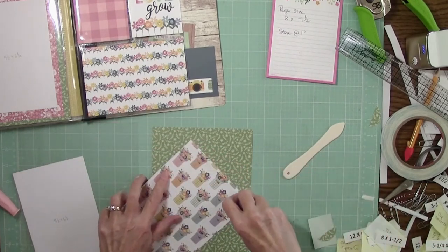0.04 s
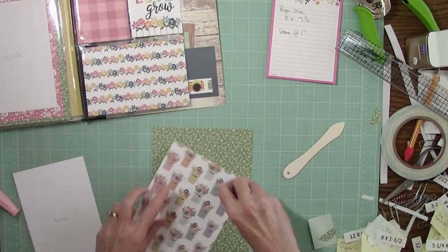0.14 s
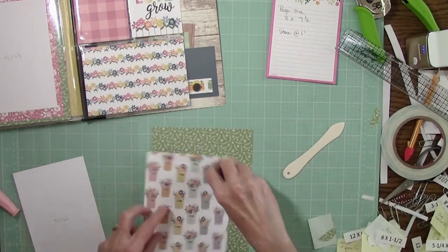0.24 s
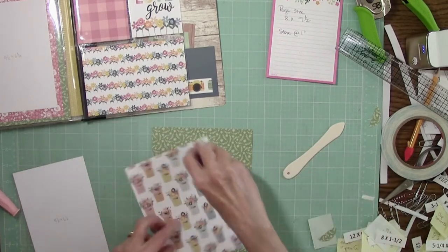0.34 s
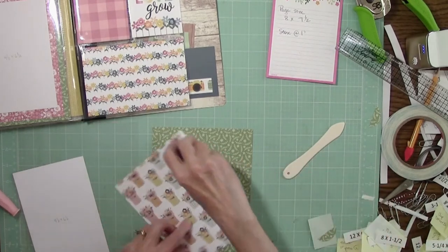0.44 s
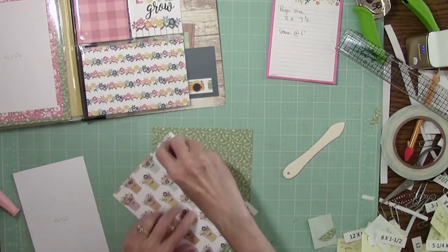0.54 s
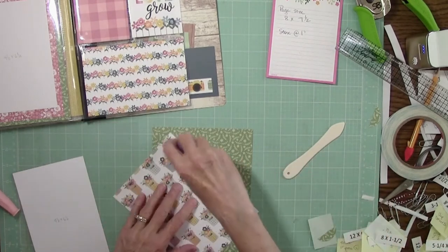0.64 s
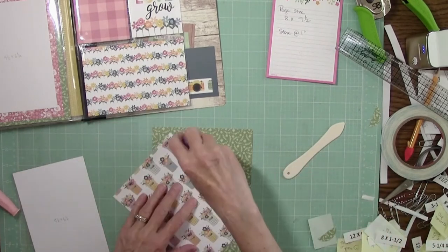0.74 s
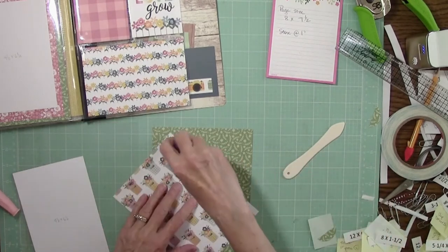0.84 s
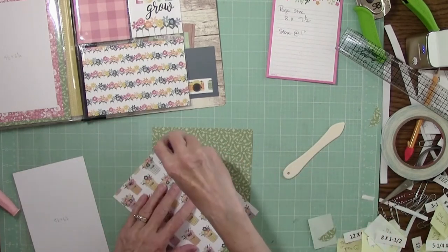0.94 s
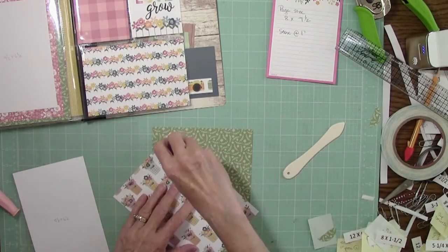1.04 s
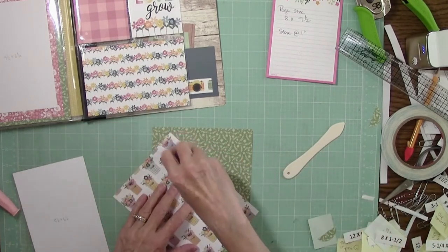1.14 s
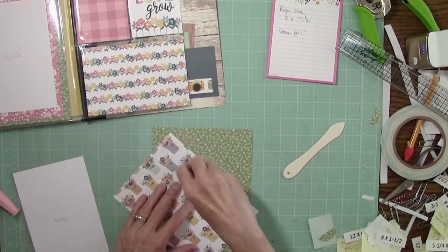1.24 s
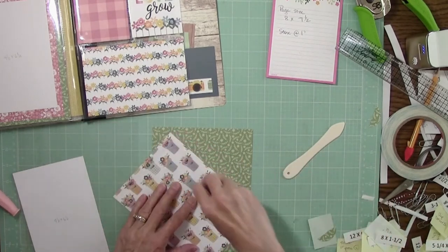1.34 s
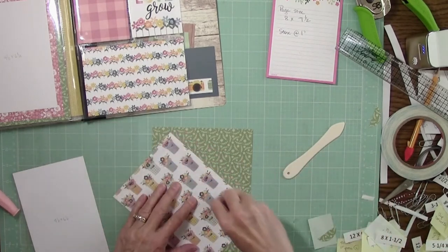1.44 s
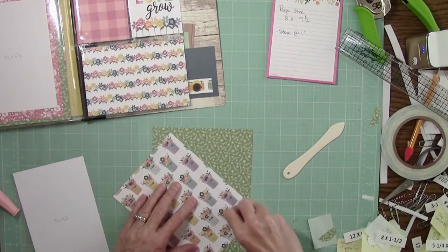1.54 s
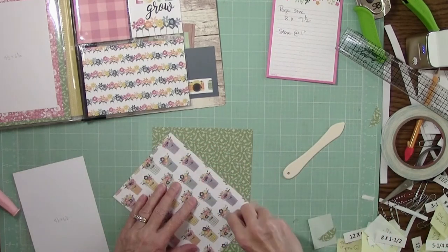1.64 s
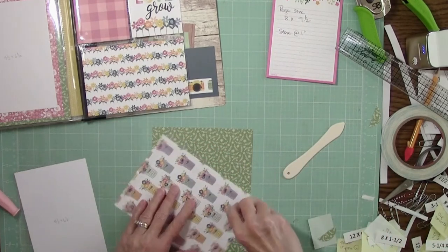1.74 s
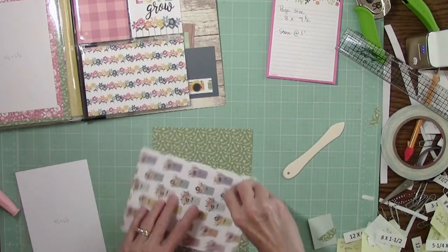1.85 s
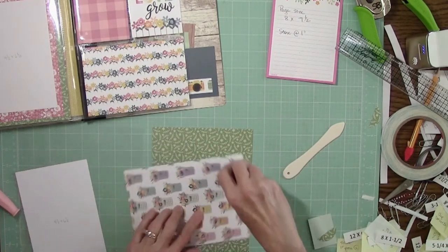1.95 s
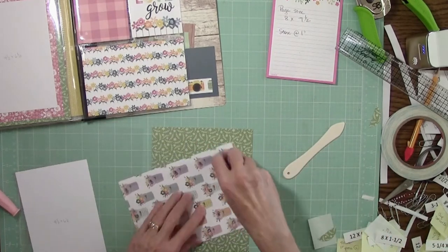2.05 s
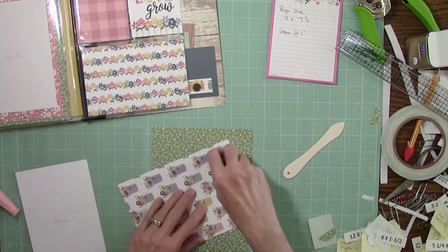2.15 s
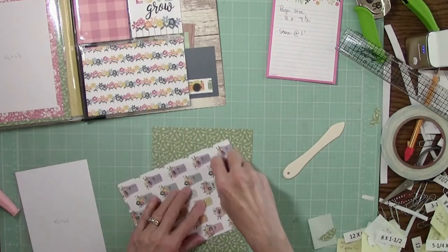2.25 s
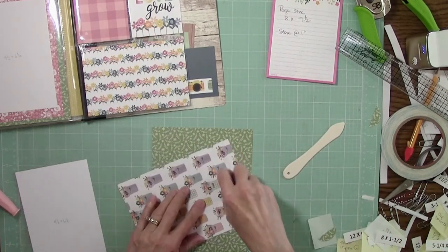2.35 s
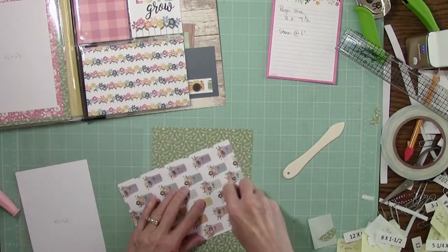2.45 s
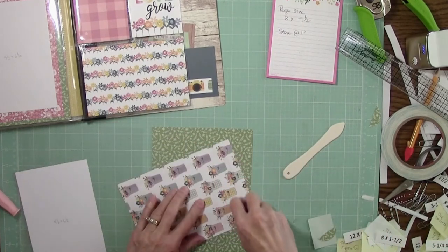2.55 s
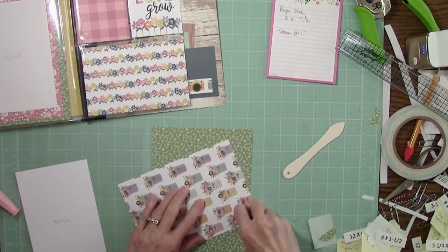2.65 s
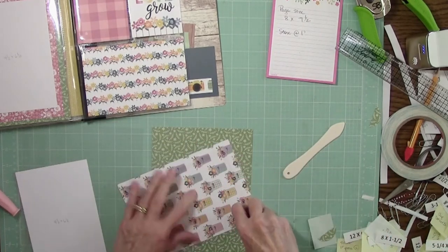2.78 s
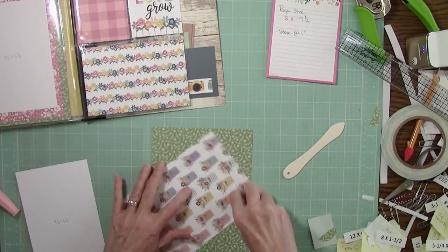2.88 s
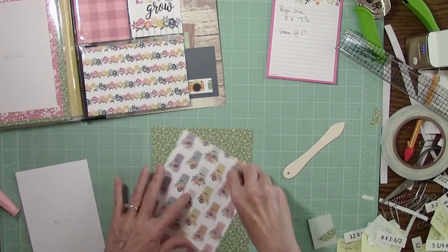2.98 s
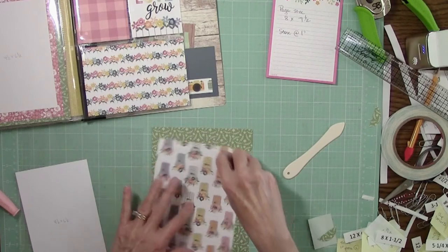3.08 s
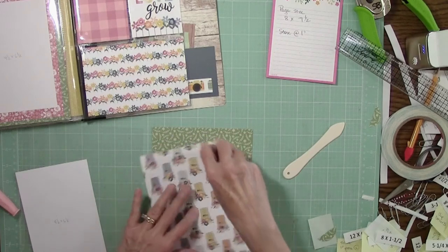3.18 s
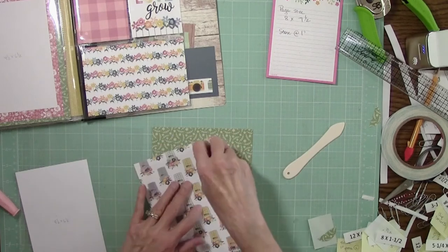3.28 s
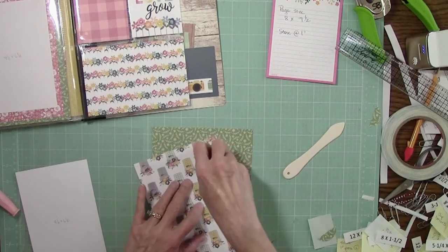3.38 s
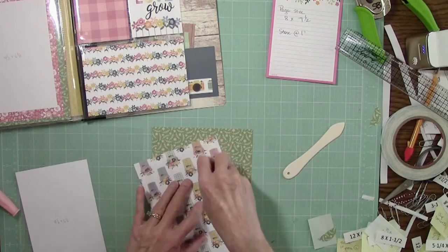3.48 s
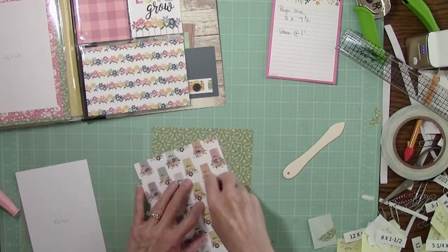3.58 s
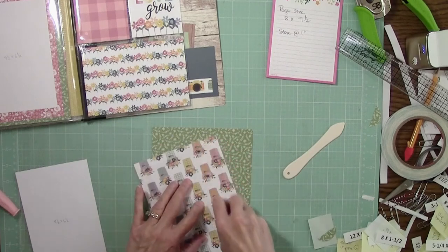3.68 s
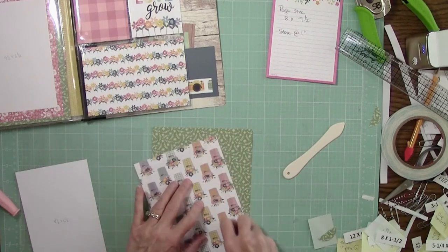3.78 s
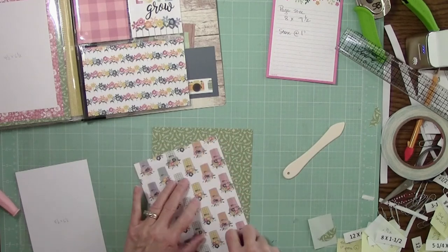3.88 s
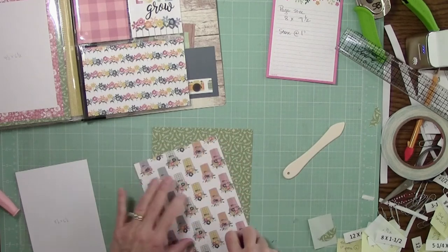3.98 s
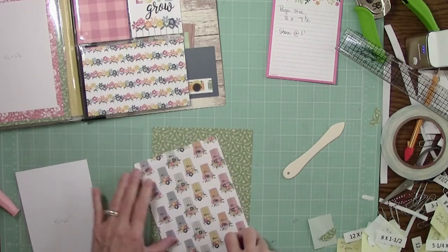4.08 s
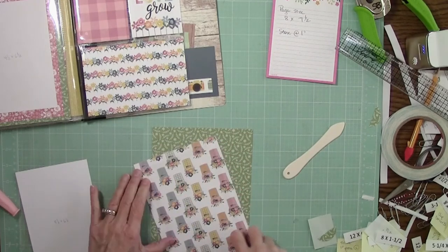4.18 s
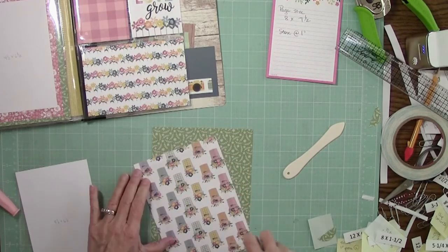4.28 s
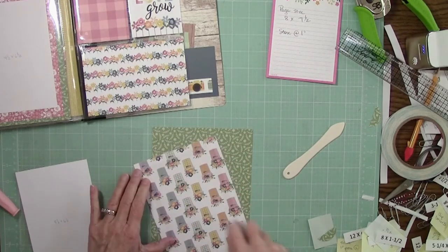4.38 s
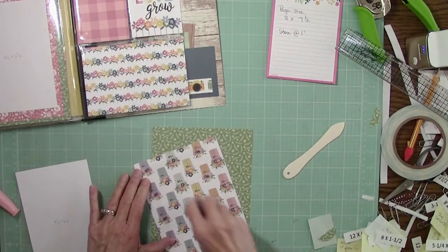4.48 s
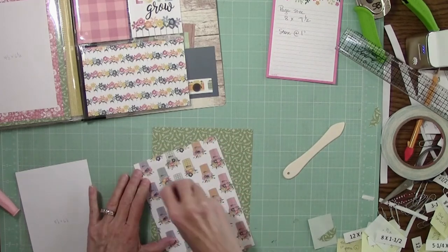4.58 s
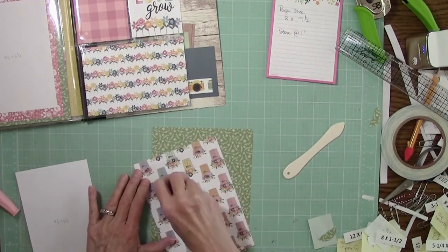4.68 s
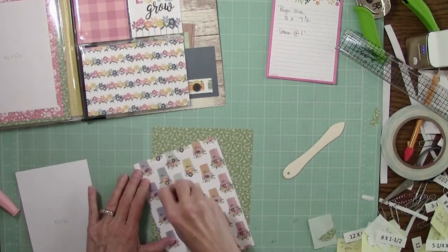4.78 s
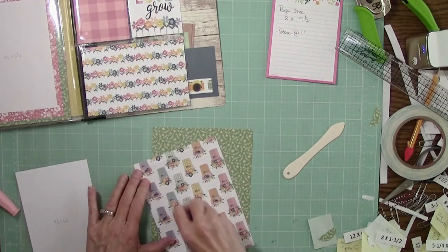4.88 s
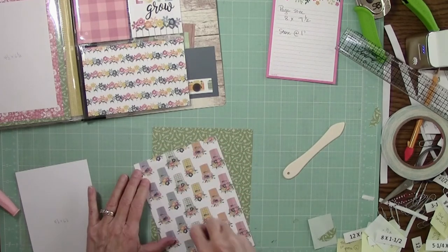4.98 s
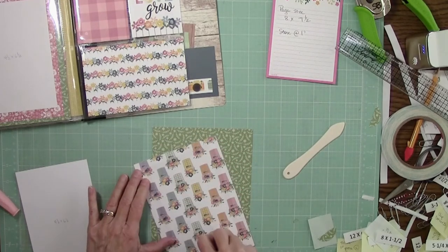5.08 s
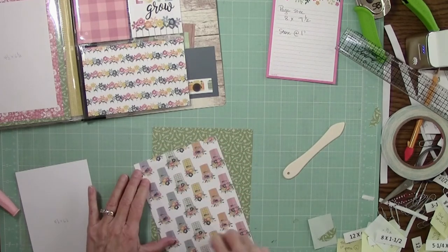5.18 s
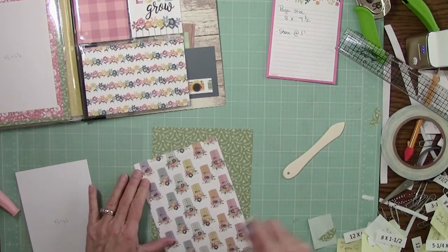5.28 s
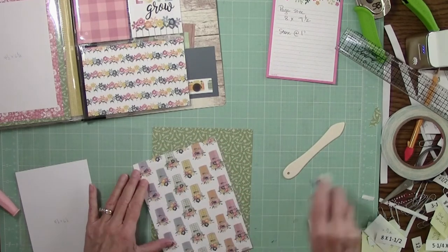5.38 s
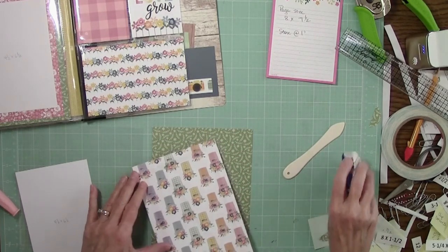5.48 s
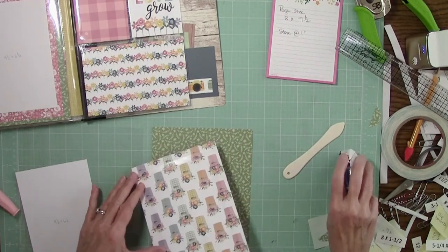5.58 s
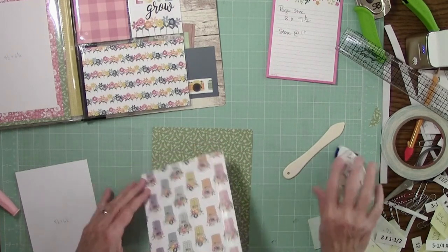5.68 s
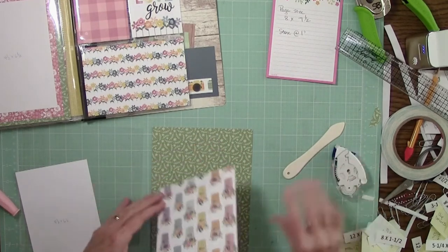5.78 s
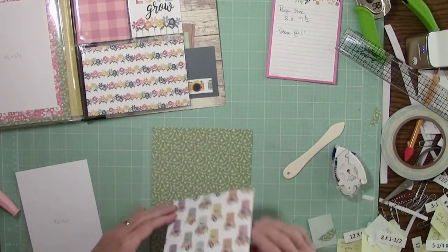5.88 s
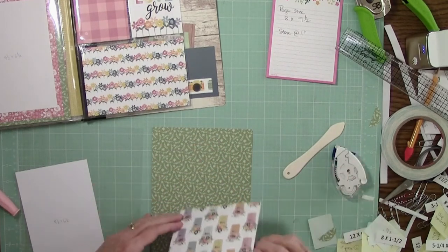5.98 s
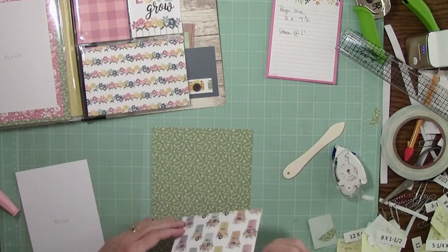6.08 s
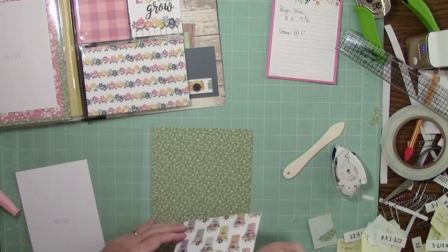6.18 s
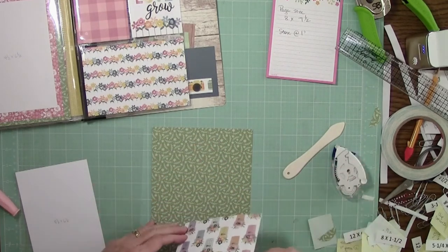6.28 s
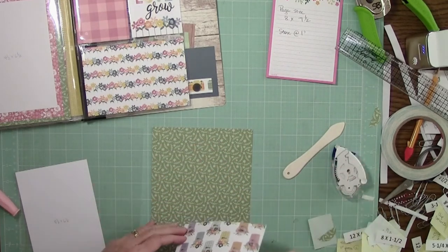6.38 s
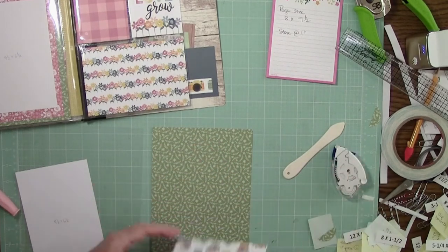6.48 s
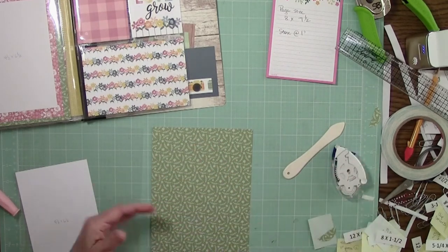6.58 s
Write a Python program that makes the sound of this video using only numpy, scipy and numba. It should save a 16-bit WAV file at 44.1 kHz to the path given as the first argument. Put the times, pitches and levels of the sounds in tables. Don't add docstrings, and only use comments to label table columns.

```python
import sys
import numpy as np
from scipy import signal
from scipy.fft import rfft, irfft, next_fast_len
from scipy.io import wavfile
from scipy.ndimage import uniform_filter1d
from numba import njit

SR = 44100
rng = np.random.default_rng(int(sys.argv[2]) if len(sys.argv) > 2 else 0)


def magnitude_from_level(level_db):
    exponent = np.asarray(level_db, float) / 20
    return 10 ** exponent


def unload_wav(signal):
    wavfile.write(
        sys.argv[1],
        SR,
        np.round(np.clip(np.atleast_2d(signal).T, -1, 1) * 32767).astype(np.int16),
    )


N = 292427
TIME_S = np.arange(N) / SR

# (time [s], drag level [dB])
STROKES = [
    [(1.19, -31), (1.202, -30.5), (1.222, -34), (1.26, -26.5), (1.604, -27), (1.692, -36), (1.77, -56)],
    [(2.28, -39), (2.34, -29.5), (2.406, -33), (2.496, -27), (2.53, -29), (2.656, -26.5), (2.77, -49)],
    [(3.5, -32.5), (3.508, -29), (3.576, -25.5), (3.708, -26.5), (3.846, -22.5), (3.852, -25.5),
     (3.96, -30.5), (4.08, -53)],
    [(4.83, -44), (4.88, -25.5), (4.964, -22.5), (5.036, -26), (5.066, -23), (5.146, -28.5), (5.24, -49)],
]
# (time [s], peak [dB])
FIRST_TEETH = [(1.152, -18.5), (1.165, -14), (1.176, -17), (1.183, -18), (1.19, -20), (1.2, -28),
               (2.277, -26), (2.293, -28), (2.303, -21), (2.315, -17.5), (3.429, -23), (3.455, -18.5),
               (3.478, -18), (3.492, -19), (3.502, -24.5), (3.509, -32)]
# (time [s], length [s], boost [dB], cavity frequency [Hz])
BOOMS = [(1.19, .03, 5, 1330), (1.235, 0.027, 1, 1280), (1.31, 0.092, 2.5, 1450), (1.49, .04, 2, 1366),
         (1.585, 0.052, 7, 1550), (2.345, 0.11, 7.5, 1360), (2.455, 0.064, 3, 1370), (2.65, 0.083, 2, 1417),
         (3.6, 0.035, 0, 1510), (3.735, 0.038, 4, 1460), (3.89, 0.055, 4, 1430), (3.96, 0.028, 4.5, 1550),
         (4.06, 0.04, 0, 1570), (4.95, 0.051, 6, 1443), (5.14, 0.048, 3, 1355)]
# (frequency [Hz], width [Hz], level [dB])
SHELL_MODES = [(2510, 1060, -9), (2724, 293, 0), (2995, 320, -3), (3328, 383, 0), (3734, 600, -5),
               (4260, 254, -3.5), (4750, 1640, -14)]
# (frequency [Hz], width [Hz], level [dB])
PEEL_MODES = [(5650, 890, -1.5), (7450, 1160, 4.5), (9480, 1670, 3.5), (13000, 2300, -2)]
# (frequency [Hz], width [Hz], level [dB])
CRACK_MODES = [(5150, 970, -2.5), (7260, 3400, 1.5), (9640, 2400, 2.5), (12640, 3600, -4.5)]
# (time [s], peak [dB], voice [0 cavity, 1 shell, 2 crack])
TICKS = [(0.012, -26, 0.79), (0.054, -26, 1.6), (0.342, -27, 1.5), (0.453, -31, 1.7), (0.627, -31, 0.39),
         (0.712, -30.5, 1.8), (0.809, -40, 0.54), (0.88, -41.5, 0.1), (1.013, -26.5, 0.47),
         (1.086, -34, .3), (1.118, -37, 1.1), (1.144, -30, 0.88), (2.045, -18.5, 1.84),
         (2.248, -21.5, 1.05), (2.256, -24, 1.4), (2.866, -38, .1), (4.097, -37, 1.2), (4.206, -32, 1.8),
         (4.295, -32, 1.8), (4.735, -29, 0.1), (4.837, -34, .1), (5.251, -29.5, 2.1), (5.26, -28.5, 0.088),
         (5.381, -26.5, 0.43), (5.446, -38, .3), (6.164, -38.5, 0.34), (6.235, -45, 0.44),
         (6.342, -45, 0.25)]
# (time [s], peak [dB])
SNAPS = [
    (0.303, -15),
    (0.722, -29),
    (1.842, -16),
    (2.95, -17),
    (3.841, -18),
    (4.164, -34),
    (4.268, -28),
    (4.272, -25),
    (4.279, -26),
    (4.284, -23),
]
# (level [dB]) in cavity, shell, crack
SNAP_MIX_DB = [-20, -20.5, 0.]
# (level [dB]) in cavity, shell, peel
TOOTH_MIX_DB = [-14.5, -10.5, -10.5]
# (time [s], rub level [dB])
TURNS = [
    [(.108, -57), (.162, -38), (.2, -40.5), (.3, -37.5), (.412, -34), (.452, -34.5), (.488, -39),
     (.55, -37.5), (.705, -55.5)],
    [(1.772, -60), (1.806, -36.5), (1.84, -35.5), (1.9, -35.5), (1.984, -35.5), (2.02, -38), (2.06, -41),
     (2.188, -44.5), (2.22, -60)],
    [(2.79, -57), (2.862, -51), (2.942, -41.5), (2.98, -38), (3.134, -40.5), (3.2, -41), (3.302, -39.5),
     (3.36, -49.5), (3.408, -55)],
]
# (peak time [s], length [s], hiss [dB], sheet body [dB])
BRUSHES = [(0.0, 0.064, -41.5, -31), (0.066, 0.063, -62, -44), (2.233, 0.033, -54, -40.5),
           (4.155, .03, -57, -51), (4.211, 0.025, -44.5, -40), (4.244, 0.021, -50, -48),
           (4.282, 0.044, -39, -40), (5.255, 0.042, -49, -45), (5.318, 0.03, -51, -60),
           (5.385, 0.078, -52, -49), (5.48, 0.11, -54.5, -53)]
# (start [s], end [s], start [Hz], end [Hz], width [Hz], level [dB])
SQUEAKS = [
    (0.16, 0.277, 2930, 2760, 45, -40.5),
    (0.32, 0.49, 7700, 7500, 400, -32.5),
    (0.333, .4, 3170, 3370, 100, -45),
    (0.417, 0.475, 2600, 2480, 200, -45),
    (2.85, 2.91, 1560, 1480, 220, -49),
    (2.93, 2.998, 1480, 1400, 220, -47),
    (4.13, 4.17, 1500, 1480, 200, -51),
]
# (frequency [Hz], density [dB/Hz])
SLIDE_HISS = [(2350, -74), (4000, -13.5), (7150, 3), (10300, -1), (15300, -11.5), (16200, -27),
              (16500, -43)]
# (frequency [Hz], density [dB/Hz])
SLIDE_BODY = [(530, -28), (900, -13), (960, -8), (1310, -3.5), (3230, -1.5), (3780, -3), (5000, -10),
              (6500, -17.5), (11000, -120)]
# (time [s], peak [dB], voice [0 low, 1 mid, 2 bright])
SCUFFS = [
    (0.713, -26, 1.95),
    (3.417, -25, 1),
    (4.272, -34, 1.4),
    (4.735, -29, 0.7),
    (6.163, -36, 0.59),
    (6.539, -18.5, 0.8),
]
# (time [s], peak [dB])
FLAPS = [
    (6.168, -42),
    (6.183, -42),
    (6.455, -37.5),
    (6.543, -39),
    (6.56, -33),
    (6.574, -33),
    (6.598, -40),
]
# (time [s], peak [dB])
LANDING = [
    (5.6195, 0.5),
]
# (level [dB]) in table, low, mid, crack
LANDING_MIX_DB = [-22.5, -15, -10, -6.5]
# (time [s], peak [dB], voice [0 table, 1 low, 2 mid, 3 crack])
KNOCKS = [
    (5.764, -22.5, 1.7),
    (5.778, -19, 0.93),
    (5.786, 2.5, 2.28),
]
# (level [dB]) in table, low, mid, crack
KNOCK_MIX_DB = [-5, -0.3, -7.5, 0.3]
# (time [s], peak [dB], voice [0 table, 1 low, 2 mid, 3 crack])
EDGE_TAPS = [
    (6.433, -43, .9),
    (6.453, -14, 1.5),
    (6.4565, -16, 1.33),
    (6.5529, -15.5, 2.64),
    (6.5565, -12.5, 1.58),
]
# (level [dB]) in table, low, mid, crack
EDGE_MIX_DB = [-5, -0.1, -6, -2]
# (frequency [Hz], width [Hz], level [dB])
KNOCK_MODES = [
    [(266, 72, -3), (582, 235, 4.5)],
    [(768, 440, 1.5), (1280, 870, 2), (1980, 950, 2.5), (2600, 800, -1)],
    [(3470, 560, 7.5), (4510, 550, 6.5)],
    [(6720, 2600, 4), (7700, 2720, 4.5), (10680, 3400, -7.5)],
]
# (time [s], peak [dB])
THUMPS = [
    (1.011, -28),
    (1.359, -39),
    (3.719, -36.5),
    (4.959, -35.5),
    (5.629, -30),
    (5.66, -32),
    (5.79, -34.5),
    (6.179, -57),
    (6.574, -39.5),
]
# (frequency [Hz], T60 [s])
ROOM_T60 = [(300, 0.49), (1500, 0.49), (4000, 0.42), (9000, 0.11), (15000, 0.36)]
# (frequency [Hz], density [dB/Hz])
AIR = [(18, -16), (25, -3), (50, 3.5), (100, 2), (200, 0.5), (310, 0), (500, -3.5), (1000, -8.5),
       (2000, -9), (4000, -15.5), (8000, -19.5), (13000, -25.5), (16500, -32)]
# (frequency [Hz], side minus mid [dB])
AIR_SIDE = [(25, -10), (60, -9), (125, -1), (300, 1.5), (700, 1), (1300, -1), (2400, -11.5), (8000, -6.5),
            (16000, -5)]
# (frequency [Hz], level [dB])
HUM = [(120, -59), (241, -59)]

FULL_DRAG_DB, TEETH_HZ, TEETH_SPAN_DB, SLOWEST_SHARE = -26, 484.2, 12, 0.25
CAVITY_WIDTH_HZ, BOOM_WIDTH_HZ = 270, 133
CAVITY_DB, RASP_DB, SEAM_DB, GRIP_DB = -6, -14, -6, 2.5
PEEL_DB, PEEL_DB_PER_DRAG_DB = -4, 0.21
SHEET_DB, SHEET_DB_PER_RUB_DB, FIRM_RUB_DB = -43, 0.79, -36
BRUSH_RISE_SHARE, BRUSH_FALL_DB = 0.27, 15.5
OPEN_DB, DUCK_S, DUCK_DB, RECOVER_DB_PER_S = 1.24, 5.593, -10, 2.5
AIR_DB, AIR_SWELL_DB = -45.5, 0.7


def level(x, db):
    return x * magnitude_from_level(db) / np.sqrt(np.mean(x ** 2))


@njit
def svf(x, hz, width_hz):
    y, band, low = np.empty(len(x)), 0., 0.
    for i in range(len(x)):
        g, k = np.pi * hz[i] / SR, width_hz / hz[i]
        g = g + g ** 3 / 3 + 2 * g ** 5 / 15
        v = (band + g * (x[i] - low)) / (1 + g * (g + k))
        band, low, y[i] = 2 * v - band, low + 2 * g * v, k * v
    return y


def walk(rate_hz):
    hold = int(SR / rate_hz)
    return 1.1 * uniform_filter1d(np.repeat(rng.standard_normal(N // hold + 1), hold), hold)[:N]


def ring(x, modes, patchy_db=0):
    out = 0
    for k, (hz, width_hz, db) in enumerate(modes):
        grip_db = patchy_db * walk(22) if patchy_db else 0
        mode = signal.lfilter(*signal.iirpeak(hz, hz / width_hz, SR), x)
        out = out + (-1) ** k * magnitude_from_level(db + grip_db) * mode
    return out


def colour(x, spectrum):
    hz, db = np.transpose(spectrum)
    size = next_fast_len(len(x))
    log_hz = np.log(np.arange(size // 2 + 1) * SR / size + 1)
    gain_db = np.interp(log_hz, np.log(hz), db, left=-90, right=-90)
    return irfft(rfft(x, size) * magnitude_from_level(gain_db), size)[:len(x)]


def spans(tables):
    rows = []
    for table in tables:
        rows += [(table[0][0] - 0.012, -90), *table, (table[-1][0] + 0.014, -90)]
    return np.interp(TIME_S, *np.transpose(rows))


def voiced(events, mix_db, fall_db=0):
    bodies = np.arange(len(mix_db))
    return [(s, db, *(np.array(mix_db) - fall_db * np.abs(bodies - sum(voice)))) for s, db, *voice in events]


def blows(events, bodies, contact_s, gain_db, rise_s=0.00011, rough=1, order=1, size=2048):
    out, t = np.zeros(N + size), np.arange(size) / SR
    shape = np.exp(-t / contact_s) * np.minimum((t + 1 / SR) / rise_s, 1)
    pushes = (rough * rng.standard_normal((len(events), size)) + 1 - rough) * shape
    for k, modes in enumerate(bodies):
        sounds = ring(pushes, modes)
        if order == 2:
            sounds = ring(sounds, modes)
        for row, sound in zip(events, sounds):
            peak = magnitude_from_level(row[1] + row[2 + k] + gain_db)
            out[int(row[0] * SR):][:size] += sound * peak / np.max(np.abs(sound))
    return out[:N]


def runner():
    drag_db = spans(STROKES)
    speed = np.clip(1 + (drag_db - FULL_DRAG_DB) / TEETH_SPAN_DB, SLOWEST_SHARE, 1)
    tooth_count = np.cumsum(TEETH_HZ * speed * (1 + 0.28 * walk(90))) / SR
    teeth = np.diff(np.floor(tooth_count), prepend=0) > 0
    teeth = teeth * magnitude_from_level(1.43 * rng.standard_normal(N)) / np.sqrt(speed)
    snap = level(signal.lfilter([1], [1, -np.exp(-1 / (0.00029 * SR))], teeth), 0)
    low, mid, high = (snap + magnitude_from_level(2.0 + 0.51 * walk(40))) * rng.standard_normal((3, N))

    cavity_hz = np.interp(TIME_S, *np.transpose(BOOMS)[[0, 3]])
    cavity = level(svf(svf(low, cavity_hz, 1. * CAVITY_WIDTH_HZ), cavity_hz, 1150.0), 0)
    seam = ring(low, [(1450, 330, 4.5), (1330, 17, -24), (1715, 16, 14.0)], patchy_db=GRIP_DB)
    cavity = level(cavity + level(seam, SEAM_DB), 0)
    boom_db = sum(boost_db * np.exp(-(2 * (TIME_S - s) / length_s) ** 2) for s, length_s, boost_db, _ in BOOMS)
    boom = level(svf(svf(low, cavity_hz, 1. * BOOM_WIDTH_HZ), cavity_hz, 450.0), 0)
    boom = boom * np.sqrt(magnitude_from_level(2 * boom_db) - 1)

    rasp = level(ring(mid, [(1920, 730, 4), (5220, 1900, 0.5), (14400, 2100, -8)]), RASP_DB)
    shell_band = signal.butter(1, [1900, 5000], "band", fs=SR, output="sos")
    shell = level(signal.sosfilt(shell_band, ring(mid, SHELL_MODES, patchy_db=GRIP_DB)), -3)
    peel_db = PEEL_DB + PEEL_DB_PER_DRAG_DB * (drag_db - FULL_DRAG_DB)
    peel = magnitude_from_level(peel_db) * level(ring(high, PEEL_MODES, patchy_db=2.5), 0)
    return magnitude_from_level(drag_db) * (magnitude_from_level(CAVITY_DB) * (cavity + boom) + rasp + shell + peel)


def housing_taps():
    clicks = voiced(TICKS, [0., 0., 0.], fall_db=10.5) + voiced(SNAPS, SNAP_MIX_DB)
    click_bodies = [[(1330, 860, 23), (1900, 390, -20)], SHELL_MODES, CRACK_MODES]
    out = blows(clicks, click_bodies, contact_s=0.001, gain_db=4.5, order=2)
    tooth_bodies = [[(1360, 180, 0)], SHELL_MODES, PEEL_MODES]
    out += blows(voiced(FIRST_TEETH, TOOTH_MIX_DB), tooth_bodies, contact_s=0.0023, gain_db=4,
                 rise_s=0.0005, order=2)
    return out + blows([(5.580, -29.5, 0.0081)], [[(1850, 410, 0)]], contact_s=0.0033, gain_db=-1.0,
                       rise_s=0.002, order=2)


def knocks():
    drops = voiced(LANDING, LANDING_MIX_DB) + voiced(KNOCKS, KNOCK_MIX_DB, fall_db=6)
    edges = voiced(EDGE_TAPS, EDGE_MIX_DB, fall_db=7.0)
    crack = blows(drops + edges, KNOCK_MODES, contact_s=0.00062, gain_db=3)
    rattle = blows(drops + edges, KNOCK_MODES, contact_s=0.0049, gain_db=-8.5)
    clean = dict(contact_s=1 / SR, rise_s=1 / SR, rough=0)
    radiated = blows(drops, KNOCK_MODES, gain_db=5, **clean) + blows(edges, KNOCK_MODES, gain_db=-1, **clean)
    return crack + rattle, radiated


def card_rub():
    rub_db = spans(TURNS)
    hiss = magnitude_from_level(rub_db)
    body = (rub_db > -85) * magnitude_from_level(SHEET_DB + SHEET_DB_PER_RUB_DB * (rub_db - FIRM_RUB_DB))
    for s, length_s, hiss_db, body_db in BRUSHES:
        away_s = np.maximum(TIME_S - s, (s - TIME_S) / BRUSH_RISE_SHARE)
        touch = magnitude_from_level(-BRUSH_FALL_DB * away_s / length_s)
        hiss = hiss + magnitude_from_level(hiss_db) * touch
        body = body + magnitude_from_level(body_db) * touch
    grains = rng.standard_normal(N) * magnitude_from_level(2.4 * rng.exponential(size=N) + 1.16 * walk(60))
    out = hiss * level(colour(grains, SLIDE_HISS), 0.5) + body * level(colour(grains, SLIDE_BODY), 0.5)
    for start_s, end_s, from_hz, to_hz, width_hz, squeak_db in SQUEAKS:
        along = np.clip((TIME_S - start_s) / (end_s - start_s), 0, 1)
        whistle = svf(grains, from_hz + (to_hz - from_hz) * along, 1. * width_hz)
        out += np.sin(np.pi * along) * level(whistle, squeak_db)
    return out


def card_taps():
    scuffs = voiced(SCUFFS, [-1.5, -0.4, -1.5], fall_db=4)
    out = blows(scuffs, [KNOCK_MODES[1], SHELL_MODES, CRACK_MODES], contact_s=0.017, gain_db=-8,
                rise_s=0.0018, size=4096)
    return out + blows(voiced(FLAPS, [0]), [[(550, 370, 0), (820, 300, -1.5)]], contact_s=0.0085, gain_db=0.5,
                       rise_s=0.0018, order=2)


def table_thumps():
    table = [[(68.4, 42, -5), (146, 61, -4.5), (260, 59, 0.5), (364, 134, -3.5)]]
    return blows(voiced(THUMPS, [0]), table, contact_s=0.018, gain_db=0, rise_s=0.0015, order=2, size=8192)


def room(x):
    t = np.arange(SR // 2) / SR
    hz, t60_s = np.transpose(ROOM_T60)
    echoes = []
    for _ in range(2):
        tail = 0
        for centre_hz in 180 * 2 ** np.arange(0, 6.6, 0.5):
            band = ring(rng.standard_normal(len(t)), [(centre_hz, centre_hz / 3.8, 0)])
            tail = tail + band * magnitude_from_level(-60 * t / np.interp(centre_hz, hz, t60_s))
        onset = np.minimum(t / 0.008, 1)
        echoes.append(signal.oaconvolve(x, tail * onset / np.sqrt(np.sum(tail ** 2)))[:N])
    mid, side = echoes
    return mid + magnitude_from_level(-17.5) * side * np.array([[1], [-1]])


def air():
    mid, side = (colour(rng.standard_normal(N), AIR) for _ in range(2))
    side = colour(side, [(20, AIR_SIDE[0][1]), *AIR_SIDE, (20000, AIR_SIDE[-1][1])])
    hum = 0
    for hz, db in HUM:
        swell = magnitude_from_level(db + 2 * walk(6)) * np.sqrt(2)
        hum = hum + swell * np.sin(2 * np.pi * hz * TIME_S + 0.5 * walk(3.5))
    scale = magnitude_from_level(AIR_DB + AIR_SWELL_DB * walk(2.86)) / np.std(mid)
    return scale * (mid + side * np.array([[1], [-1]])) + hum


def scene():
    near = runner() + housing_taps() + card_rub() + card_taps() + table_thumps()
    direct, radiated = knocks()
    pan = magnitude_from_level(np.array([[-0.2], [0.2]]))
    ducked = np.clip((TIME_S - DUCK_S) / 0.01 + 0.5, 0, 1)
    recovering_db = DUCK_DB + RECOVER_DB_PER_S * (TIME_S - DUCK_S)
    gain_db = OPEN_DB + ducked * (recovering_db - OPEN_DB)
    return pan * (near + direct) + room(magnitude_from_level(-9.5) * near + radiated) + air() * magnitude_from_level(gain_db)


def band_limit(x):
    return signal.sosfilt(signal.butter(12, 17020, fs=SR, output="sos"), x)


def record(dry):
    top_cut = signal.ellip(10, 0.2, 70, 16300, fs=SR, output="sos")
    mix = np.clip(signal.sosfilt(top_cut, np.clip(dry, -1.1, 1.1)), -1, 1)
    return band_limit(mix)


dry = scene()
out = record(dry)
unload_wav(out)
```